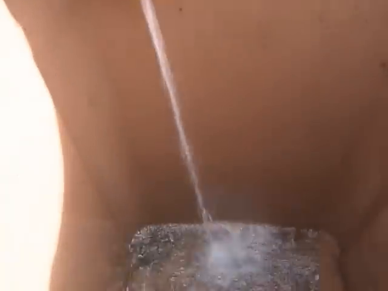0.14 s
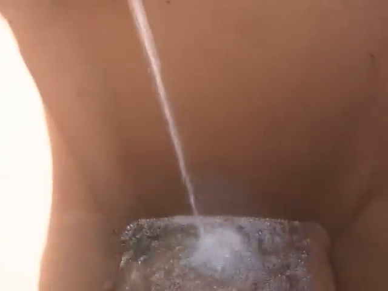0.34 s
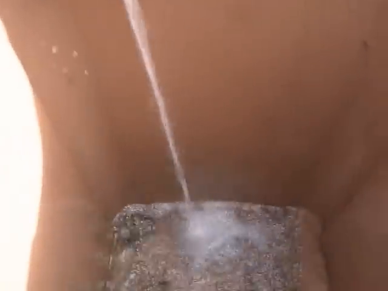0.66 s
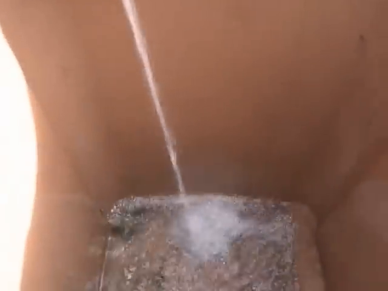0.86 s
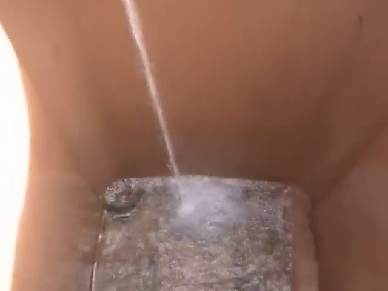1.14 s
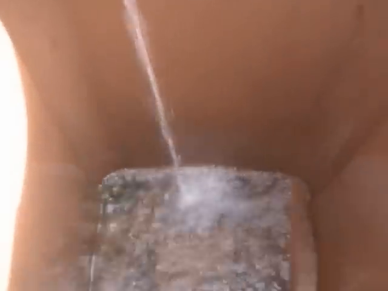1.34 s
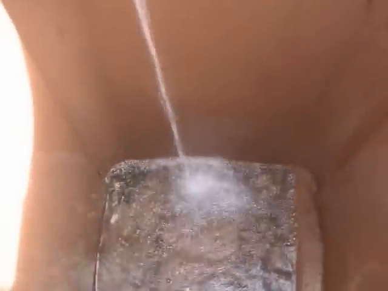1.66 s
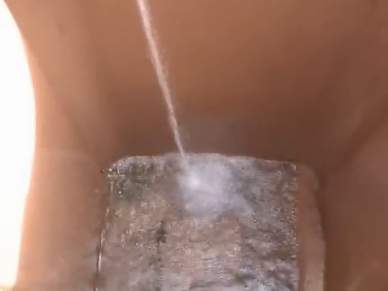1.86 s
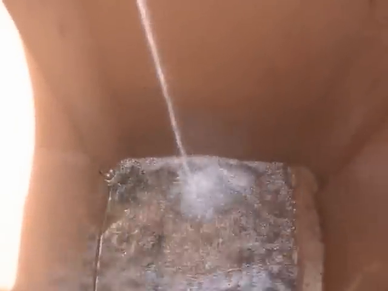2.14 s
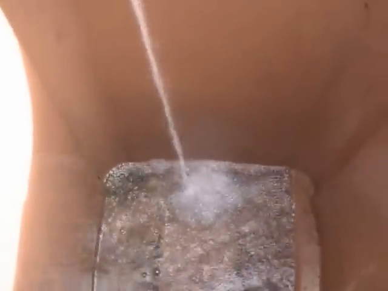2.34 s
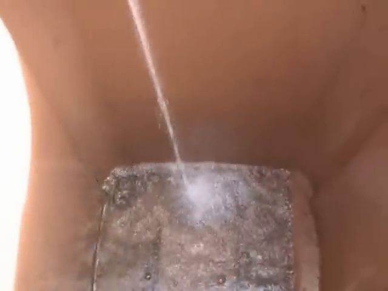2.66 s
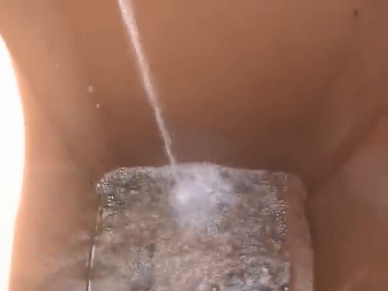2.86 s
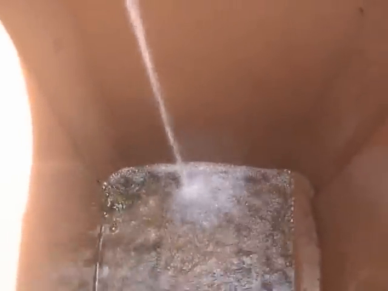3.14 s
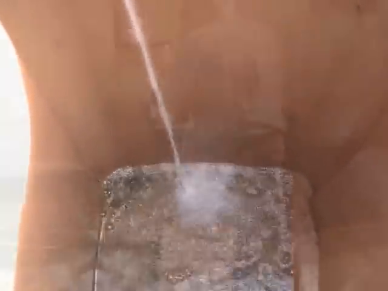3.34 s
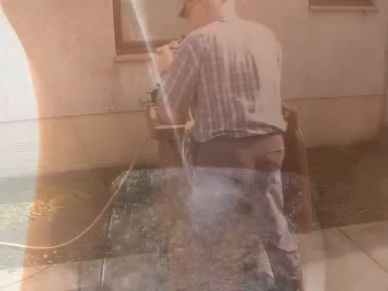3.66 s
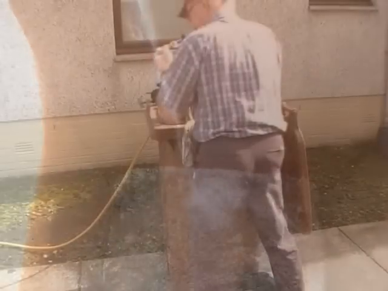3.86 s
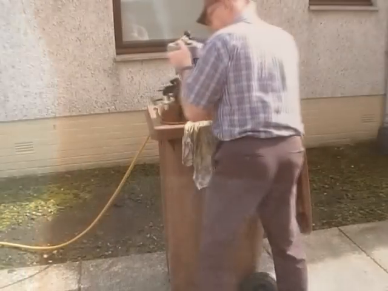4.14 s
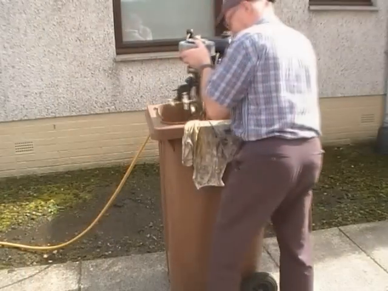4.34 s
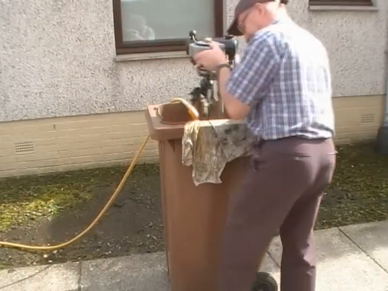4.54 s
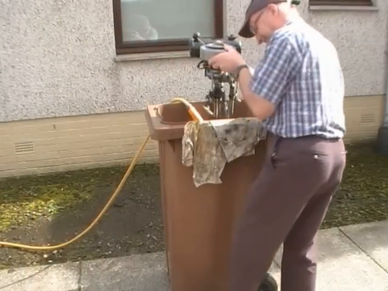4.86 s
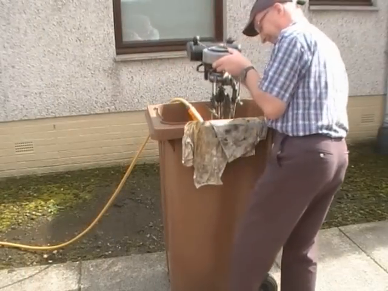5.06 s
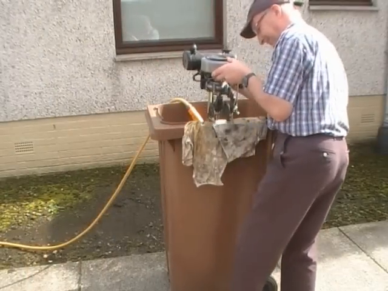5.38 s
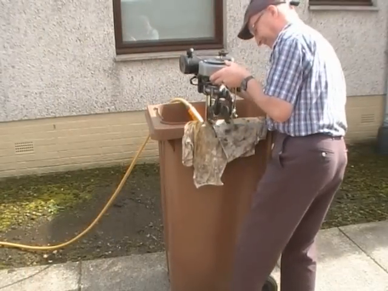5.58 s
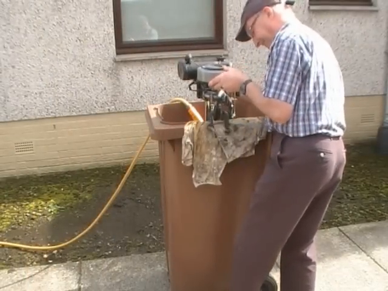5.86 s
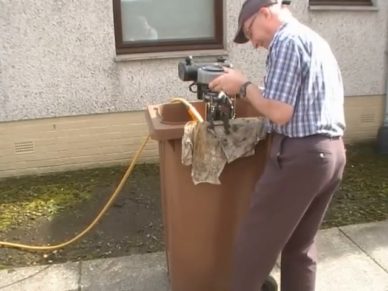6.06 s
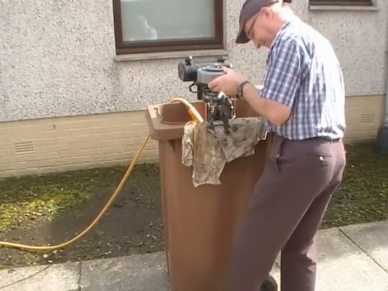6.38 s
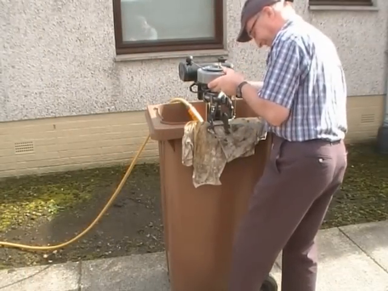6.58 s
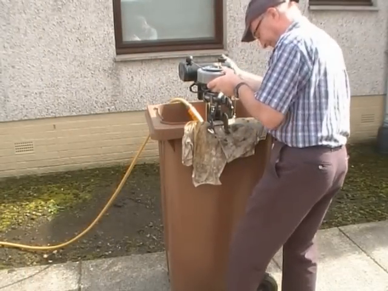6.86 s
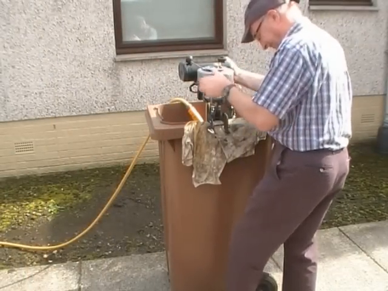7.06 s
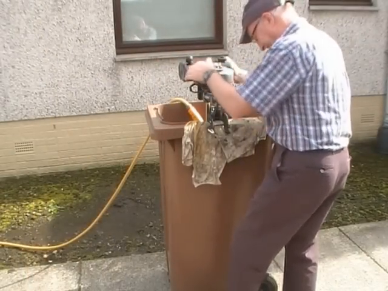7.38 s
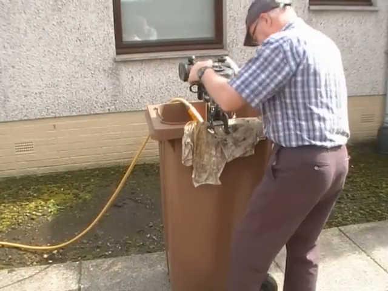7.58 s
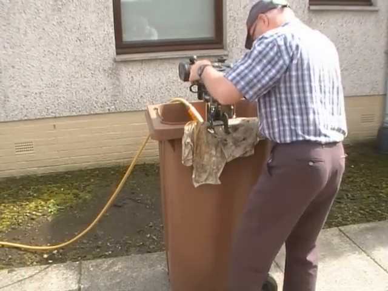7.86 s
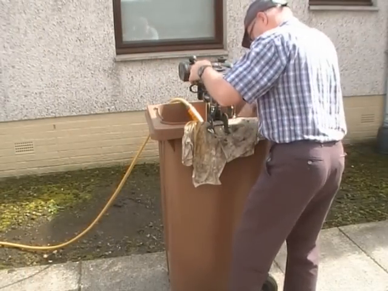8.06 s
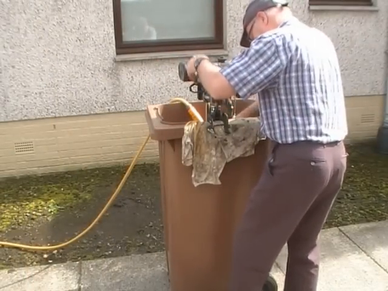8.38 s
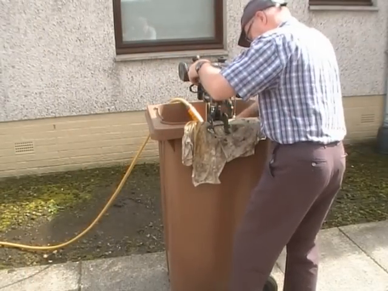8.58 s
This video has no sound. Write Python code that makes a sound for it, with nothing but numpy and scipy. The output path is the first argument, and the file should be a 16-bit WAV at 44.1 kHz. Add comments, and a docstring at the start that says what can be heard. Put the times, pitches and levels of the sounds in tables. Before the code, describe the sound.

Water sprays and drums inside a plastic bin, cuts off, and a few sharp knocks follow in a quiet yard.

```python
"""A hose jet hammers the shallow water in a plastic bin, heard from the rim, until the scene changes. Its slugs
and drops spray and drum on the pool, and entrained air rings as bubbles, coloured by the bin's resonances.
Then, from a few steps away: the wash of distant traffic, far birds, rustling cloth and small ticks, and a heavy
metal object that clinks, knocks on the bin's rim and bounces twice, each impact exciting the damped modes of
the bin and of the metal."""
import sys
import numpy as np
from scipy import signal
from scipy.io import wavfile
from scipy.ndimage import uniform_filter1d

SR = 44100
rng = np.random.default_rng(int(sys.argv[2]) if len(sys.argv) > 2 else 0)


def digitize_waveform(pressure):
    """Quantize a signal to 16-bit integers and store it at the path in sys.argv[1].

    Rows of a 2-D input are taken as channels; values are limited to [-1, 1].
    """
    field = np.atleast_2d(pressure).T
    bounded = np.clip(field, -1, 1)
    quanta = np.round(bounded * 32767).astype(np.int16)
    wavfile.write(sys.argv[1], SR, quanta)


N = 384552
T = np.arange(N) / SR
SCENE_SWITCH_S = 4.551

# spectrum of rustles and ticks: (frequency [Hz], relative level [dB])
RUSTLE_SPECTRUM = [(1470, -9), (2500, -3), (3720, -9.5), (4370, -5.5), (7890, -7), (11800, -13.5),
                   (16000, -24)]
# likeness of the background at the two ears: (frequency [Hz], coherence [0-1])
YARD_COHERENCE = [(60, 0.4), (180, 0.28), (550, 0.88), (1650, 0.78), (4970, 0.3), (15000, 0.35)]


def amp(db):
    """Amplitude ratio of a level in decibels."""
    return 10 ** (np.asarray(db) / 20)


def unit_rms(x):
    """Normalisation to unit mean power."""
    return x / np.sqrt(np.mean(x ** 2) + 1e-20)


def curve_at(points, hz):
    """Interpolation on a logarithmic frequency axis."""
    f, value = np.transpose(points)
    return np.interp(np.log(hz + 1), np.log(f + 1), value)


def add(mix, s, sound):
    """Superposition: a sound joins the mix at s seconds."""
    part = mix[:, round(s * SR):][:, :sound.shape[-1]]
    part += sound[..., :part.shape[-1]]


def panned(x, db):
    """Interaural level difference: the left is louder by db."""
    return x * amp([[db / 2], [-db / 2]])


def noise(colour_db, coherence, patch_db, size):
    """Fourier synthesis of partly coherent stereo noise, with drifting louder and softer patches."""
    hz = np.fft.rfftfreq(size, 1 / SR)
    a, b, c, d, patches = rng.standard_normal((4 * N // size + 5, len(hz), 5)).T
    patches = unit_rms(uniform_filter1d(uniform_filter1d(patches, 10, 0), 8, 1))
    likeness = np.clip(curve_at(coherence, hz), -1, 1)[:, None]
    left = a + 1j * b
    right = likeness * left + np.sqrt(1 - likeness ** 2) * (c + 1j * d)
    spectra = np.array([left, right]) * amp(colour_db(hz)[..., None] + patch_db * patches)
    return unit_rms(signal.istft(spectra, nperseg=size, noverlap=3 * size // 4)[1][:, :N])


def minimum_phase(colour_db, size=2048):
    """Causal impulse response: its phase follows from the log gain by the Hilbert transform."""
    log_gain = np.log(amp(np.maximum(colour_db(abs(np.fft.fftfreq(4 * size, 1 / SR))), -100)))
    taps = np.fft.ifft(np.exp(np.conj(signal.hilbert(log_gain)))).real[:size]
    return taps / np.linalg.norm(taps)


def impulses(per_s, spread_db):
    """A Poisson process of clicks, most small, a few large."""
    return (rng.random(N) < per_s / SR) * amp(spread_db * np.minimum(rng.exponential(1, N), 4))


def relaxed(power, decay_s):
    """Exponential relaxation: each input dies away; the result has mean 1."""
    response = signal.lfilter([1], [1, -np.exp(-1 / (decay_s * SR))], power)
    return response / response.mean()


def scattered(x, db, t60, size=800):
    """Diffuse reflection: each ear gets the direct sound and its own decaying echoes."""
    taps = amp(db) * rng.standard_normal((2, size)) * amp(-60 * np.arange(size) / SR / t60)
    taps[:, 0] = 1
    taps /= np.linalg.norm(taps, axis=1, keepdims=True)
    return signal.oaconvolve(x[None], taps, axes=1)[:, :len(x)]


def traffic():
    """Distant vehicles sum incoherently to a dull wash that swells and fades."""
    # colour of the wash: (frequency [Hz], relative level [dB])
    spectrum = [(15, -67), (25, -61), (64, -17), (153, -22), (277, -15), (416, -11), (659, -3.5),
                (936, -0.5), (1070, -4), (1790, -12.5), (2280, -19.5), (10400, -54), (16000, -47.5)]
    # its slow swell: (time [s], level [dB])
    levels = [(4.55, -43), (4.9, -44), (5.3, -42.5), (6.1, -41.5), (6.7, -42.5), (7.2, -44.5), (7.9, -42),
              (8.72, -43)]
    wash = noise(lambda hz: curve_at(spectrum, hz), YARD_COHERENCE, patch_db=1.4, size=2048)
    return amp(np.interp(T, *np.transpose(levels))) * wash


def rustle():
    """Friction of hands and cloth makes a grainy treble noise that grows with each movement."""
    # movements: (peak time [s], level [dB], swell [s], fade [s])
    shuffles = [(4.56, -43, .01, 0.034), (4.7, -66.5, .1, 0.44), (6.1, -65, 0.12, .2),
                (6.88, -51, 0.047, 0.064), (6.98, -52.5, 0.058, .04), (7.3, -70, 0.11, .2)]
    grain = relaxed(impulses(per_s=150, spread_db=3.5) ** 2, decay_s=.003)
    hiss = noise(lambda hz: curve_at(RUSTLE_SPECTRUM, hz), YARD_COHERENCE, patch_db=0.98, size=256)
    motion = sum(amp(db) * np.exp(-abs(T - s) / np.where(T < s, swell_s, fade_s))
                 for s, db, swell_s, fade_s in shuffles)
    at_rest = amp(-65.5)
    return (at_rest + motion) * hiss * np.sqrt(0.56 + 0.2 * grain)


def birds():
    """Far birds whistle gliding tones; random frequency and amplitude modulation makes two hoarse."""
    # notes: (time [s], length [s], first pitch [Hz], last pitch [Hz], level [dB], roughness [Hz])
    notes = [(5.715, .04, 3400, 4440, -59, 30), (6.406, 0.022, 5100, 5670, -64, 30),
             (6.548, .035, 4550, 5030, -59, 30), (6.56, 0.035, 3800, 4600, -56, 30),
             (7.81, 0.11, 4900, 4730, -62, 110), (7.869, .085, 3580, 3730, -53, 149)]
    out = np.zeros((2, N))
    for s, length, first_hz, last_hz, db, rough_hz in notes:
        progress = np.linspace(0, 1, round(length * SR))
        wobble, flutter = (unit_rms(uniform_filter1d(v, 150))
                           for v in rng.standard_normal((2, len(progress))))
        hz = first_hz + (last_hz - first_hz) * progress ** 1.5 + rough_hz * wobble
        swell = np.sin(np.pi * progress ** 0.57) * amp(db + 0.053 * rough_hz * flutter)
        note = np.pad(swell * np.sin(2 * np.pi * np.cumsum(hz) / SR), (0, SR // 5))
        add(out, s, scattered(note, db=-33, t60=0.4, size=SR // 5))
    return out


def ticks():
    """Loose parts touch: each brief contact gives a broadband snap and one heavily damped mode."""
    # contacts: (time [s], relative level [dB], pitch [Hz])
    contacts = [(4.6394, -43, 8820), (4.7511, -38, 5730), (4.768, -34, 5800), (4.9985, -43, 7450),
                (5.1637, -45, 8310), (5.9208, -43, 7600), (6.2744, -43, 5540), (6.382, -44, 11500),
                (6.8039, -34, 7560), (6.853, -33, 5650), (6.8912, -35, 4500), (6.9144, -31, 6600),
                (6.9344, -37, 6770), (6.9571, -37, 4930), (7.0044, -37, 7970), (7.0294, -40, 7200),
                (7.0539, -44, 5640), (7.0938, -42.5, 7100), (7.1302, -46, 6000), (7.1671, -42.5, 4880),
                (7.2684, -46, 5140), (7.3576, -44, 4550), (7.3866, -43.5, 4670), (7.659, -38, 7300)]
    out, t = np.zeros((2, N)), np.arange(500) / SR
    colour = minimum_phase(lambda hz: curve_at(RUSTLE_SPECTRUM, hz))
    for s, db, hz in contacts:
        burst = rng.standard_normal(len(t)) * amp(-60 * t / 0.013)
        snap = signal.oaconvolve(burst, colour)[:len(t)]
        ping = np.sin(2 * np.pi * hz * t) * amp(-60 * t / 0.0062)
        add(out, s, panned(amp(db) * (0.41 * snap + .5 * ping), db=-.7))
    return out


def ring(modes, t, rise_cycles):
    """Free vibration as a sum of damped modes, the low ones slower to start; no two blows are alike."""
    chance = rng.standard_normal((len(modes), 2))
    return sum(amp(db + 2. * louder - 60 * t / t60)
               * np.sin(2 * np.pi * hz * (1 + 0.0051 * sharper) * t)
               * (1 - np.exp(-hz * t / rise_cycles))
               for (hz, db, t60), (louder, sharper) in zip(modes, chance))


def blows():
    """Impact excitation: a crack with a rattling tail, the hollow bin's thud and the metal's ring."""
    # blows: (time [s], crack gain [dB], thud gain [dB], metal gain [dB],
    # crack tilt [dB/octave], thud tilt [dB/octave], left over right [dB])
    impacts = [(5.556, -80, -54, -80, -3, -14.5, -10), (5.585, -46, -46, -75, -6, 2, 0),
               (5.598, -31.5, -34.5, -45, 6, 3, 1), (5.606, -36, -42.5, -48, -1, 6, -3),
               (6.027, -10.5, -19, -55, 3.1, -1.5, -0.5), (6.129, -17.5, -23, -62, 1.2, -2, -0.5),
               (6.196, -26.5, -32, -70, -8, 0.5, -1), (6.867, -36, -58, -80, -4, 10.5, -1),
               (6.985, -37, -48, -80, 1, 7, -2.8)]
    # contact noise: (frequency [Hz], relative level [dB])
    crack_spectrum = [(590, -40), (1000, -5.5), (2200, 3), (4960, -7), (6040, -14), (8360, -7), (9060, -13),
                      (16000, -33)]
    # modes of the bin's wall: (frequency [Hz], relative level [dB], T60 [s])
    wall_modes = [(95, -19.5, 0.175), (123.4, -26, 0.68), (145, -30, 0.45), (185, -21.5, 0.33),
                  (236, -9.5, 0.14), (313, -6.5, 0.11), (381, -13.5, 0.17), (470, 10, 0.029),
                  (639, -1.5, 0.08), (821, -4.5, 0.16), (952, -9, 0.076), (1700, 0.5, 0.03),
                  (2020, -2, 0.023), (2470, -20, 0.042)]
    # modes of the metal object: (frequency [Hz], relative level [dB], T60 [s])
    metal_modes = [(5168, -19, .16), (6600, -3, .1), (7445, -10, .12), (8600, -4, 0.09), (10570, -11, .2),
                   (10600, -3, 0.17), (10860, -8, 0.12), (14600, -17, .1)]
    out, t = np.zeros((2, N)), np.arange(round(.5 * SR)) / SR
    fall = amp(-60 * t / 0.029) + amp(-9 - 60 * t / 0.2)
    for s, crack_db, thud_db, metal_db, crack_tilt, thud_tilt, pan_db in impacts:
        colour = minimum_phase(
            lambda hz: curve_at(crack_spectrum, hz) + crack_tilt * np.log2(hz / 3000 + .1))
        shared, *per_ear = rng.standard_normal((3, len(t)))
        burst = (0.46 * shared + 0.2 * np.array(per_ear)) * fall
        crack = signal.oaconvolve(burst, colour[None], axes=1)[:, :len(t)]
        # the thin walls flap on after the blow: smaller pushes thicken the thud
        pushes = 0.16 * rng.standard_normal(len(t)) * amp(-60 * t / 0.32) * (rng.random(len(t)) < .02)
        pushes[0] = 1
        wall = [(hz, db + thud_tilt * np.log2(hz / 400), t60) for hz, db, t60 in wall_modes]
        thud = signal.oaconvolve(pushes, ring(wall, t, rise_cycles=1.44))[:len(t)]
        thud = scattered(thud, db=-36, t60=0.021)
        metal = ring(metal_modes, t, rise_cycles=8.)
        add(out, s, panned(amp(crack_db) * crack + amp(thud_db) * thud + amp(metal_db) * metal, pan_db))
    return out


def plops():
    """Bubble resonance: a large bubble rings briefly, rising in pitch as it nears the surface."""
    # large bubbles: (time [s], relative level [dB], starting pitch [Hz])
    bubbles = [(0.124, -17, 1270), (0.732, -12.5, 1260), (0.94, -10.5, 1876), (1.061, -20, 1285),
               (1.131, -11, 1300), (1.403, -24, 1190), (1.934, -16, 1303), (2.044, -22, 988),
               (2.086, -18, 1204), (2.184, -15, 1235), (2.351, -23, 1280), (3.208, -13.5, 1280),
               (3.443, -17.5, 1190), (3.692, -18, 1843), (3.866, -14, 925), (3.907, -15, 2030),
               (3.981, -17, 1210), (4.141, -14.5, 1240), (4.193, -19, 970), (4.322, -9.5, 2050),
               (4.489, -13.5, 1336)]
    out, t = np.zeros((1, N)), np.arange(round(.1 * SR)) / SR
    t60 = 0.053
    for s, db, hz in bubbles:
        swell = amp(db - 60 * t / t60) * (1 - np.exp(-t / 0.0099))
        add(out, s, swell * np.sin(2 * np.pi * hz * t * (1 + 1.5 * t)))
    return panned(scattered(out[0], db=-28, t60=.02), db=-0.95)


def bin_gain_db(hz):
    """Resonance of the bin's air and walls, as Lorentzian peaks and dips."""
    # peaks and dips: (frequency [Hz], width [Hz], gain [dB])
    resonances = [(124.9, 14, 10), (265, 69, 2), (462.5, 24, 10), (643, 170, 5), (811, 25, -9.5),
                  (975, 43, 4), (1295, 81, 5.5), (1730, 35, -0.5), (1860, 82, 4), (2136, 137, 6),
                  (2470, 150, 4)]
    return sum(db / (1 + (2 * (hz - f) / width) ** 2) for f, width, db in resonances)


def gurgle(push, low_hz=700, high_hz=2900):
    """Air entrainment: bubbles ring in short rising notes, more of them as the jet pushes harder."""
    bubbles = np.zeros(N)
    for hz in np.geomspace(low_hz, high_hz, 24):
        cycles = np.arange(round(30 * SR / hz)) * hz / SR
        envelope = np.exp(-cycles / 12.0) * (1 - np.exp(-cycles / 0.95))
        note = envelope * np.sin(2 * np.pi * cycles * (1 + 0.00331 * cycles))
        births = impulses(per_s=30 * push, spread_db=0.78)
        bubbles += signal.oaconvolve(births, note * amp(2.0 * np.log2(hz / low_hz)))[:N]
    in_bin = unit_rms(signal.oaconvolve(bubbles, minimum_phase(bin_gain_db))[:N])
    return panned(scattered(in_bin, db=-28.0, t60=0.018), db=-0.9)


def jet_noise(colour_db, patch_db, size):
    """Interaural coherence and level place the water's noise close by, slightly to the right."""
    # likeness at the two ears: (frequency [Hz], coherence [0-1])
    coherence = [(60, 0.43), (110, 0.8), (200, 0.92), (380, 0.94), (700, 0.94), (1290, 0.97), (2380, 0.53),
                 (4400, 0.65), (8120, 0.65), (15000, 0.22)]
    # balance between the ears: (frequency [Hz], left over right [dB])
    balance = [(60, 1), (240, -2.5), (950, -1.5), (3770, -0.5), (15000, -0.5)]
    return noise(lambda hz: colour_db(hz) + np.outer([.5, -.5], curve_at(balance, hz)),
                 coherence, patch_db, size)


def pool():
    """Forced vibration of the pool, coloured by the bin and split into drumming and low rumble."""
    # thrum of the water: (frequency [Hz], relative level [dB])
    spectrum = [(15, -55.5), (25, -12.5), (168, -16), (273, -4.5), (351, -12.5), (594, -0.5), (826, -8.5),
                (1270, -2), (2600, -8.5), (3380, -12), (5720, -120)]
    thrum = jet_noise(lambda hz: curve_at(spectrum, hz) + bin_gain_db(hz), patch_db=1.7, size=2048)
    rumble = signal.sosfiltfilt(signal.butter(2, 380, fs=SR, output="sos"), thrum)
    return unit_rms(thrum - rumble), unit_rms(rumble)


def spray(steady, power):
    """Shot noise: countless impacts merge into a hiss, and single drops crack on top."""
    # colour of the spray: (frequency [Hz], relative level [dB])
    spectrum = [(1470, -37.5), (2500, -11), (3570, -11), (4990, -6), (6450, -6), (9010, 0.5), (11100, -9.5),
                (15200, -17), (16000, -37)]
    mist = jet_noise(lambda hz: curve_at(spectrum, hz), patch_db=1.55, size=512)
    drops = relaxed(impulses(per_s=350, spread_db=3.5) ** 2, decay_s=.0004)
    return mist * np.sqrt(power + 0.45 * np.sqrt(steady * power) * drops)


def breakup(spray_gain):
    """Jet instability breaks the stream into slugs; returns its power without and with their slaps."""
    # slugs that slap down hardest: (time [s], level [dB], duration [s])
    slaps = [(0.02, -23, 0.0043), (0.219, -25, 0.0072), (0.3143, -25, 0.026), (0.376, -23, 0.0065),
             (0.569, -24, 0.015), (0.628, -20, 0.0029), (0.77, -22, 0.018), (0.984, -22, .01),
             (1.067, -23.5, 0.025), (1.156, -20.5, 0.0078), (1.22, -20.5, 0.0062), (1.365, -24, 0.005),
             (1.4205, -25.5, 0.029), (1.529, -23.5, 0.0064), (1.6093, -21, 0.023), (1.698, -23.5, 0.0053),
             (1.783, -22.5, 0.018), (1.8612, -23.5, .005), (1.903, -26.5, 0.0045), (2.113, -19.5, 0.0089),
             (2.18, -22.5, 0.02), (2.2305, -23.5, 0.0054), (2.351, -20.5, 0.012), (2.422, -24, 0.013),
             (2.508, -22, 0.0073), (2.562, -21, 0.0093), (2.64, -22.5, 0.011), (2.71, -21.5, .008),
             (2.78, -21.5, 0.0079), (2.826, -19.5, 0.0042), (2.9115, -21.5, 0.0058), (2.953, -22.5, 0.0029),
             (2.973, -22, 0.0034), (3.027, -24, .01), (3.225, -19.5, 0.009), (3.3065, -20, 0.0062),
             (3.4227, -24.5, 0.0044), (3.509, -21.5, 0.0043), (3.656, -23, 0.0083), (3.753, -21, 0.0062),
             (4.0367, -20, 0.005), (4.093, -24, 0.0086), (4.1723, -23.5, .012), (4.343, -23.5, 0.0049),
             (4.4074, -24.5, 0.019), (4.486, -18, 0.0034)]
    rise_s, t60 = .001, 0.031
    thin_after_s, thin_width_s = 0.011, 0.014  # the stream runs thin just behind each hard slug
    thinning, t = np.zeros(N), np.arange(round(.2 * SR)) / SR
    for s, _, lasts in slaps:
        add(thinning[None], s + lasts, 0.3 * np.exp(-((t - thin_after_s) / thin_width_s) ** 2))
    steady = spray_gain ** 2 * np.clip(1 - thinning, .05, 1)
    slugs = relaxed(impulses(per_s=90, spread_db=2.0) ** 2, decay_s=.007)
    power = steady * (0.85 + 0.27 * slugs)
    for s, db, lasts in slaps:
        slap = amp(db - 60 * np.maximum(t - lasts, 0) / t60) * np.minimum(t / rise_s, 1)
        add(power[None], s, slap ** 2)
    return steady, power


def jet():
    """Momentum transfer: the stream drives spray, drumming and gurgle until the scene changes."""
    # surges and sags: (time [s], spray gain [dB], drumming gain [dB], gurgle gain [dB])
    surges = [(0.0, -24.5, -30, -34), (0.08, -28.5, -36.5, -31), (0.21, -22, -25.5, -35.5),
              (0.4, -25.5, -29, -36), (0.56, -23, -28, -32), (0.65, -28.5, -36, -36.5),
              (0.74, -27.5, -32.5, -33.5), (0.86, -29, -34, -38), (0.94, -23.5, -33, -27),
              (1.03, -26, -29.5, -35.5), (1.2, -24.5, -29, -32), (1.3, -27.5, -31, -37),
              (1.439, -24.5, -34.5, -30), (1.6, -27, -31.5, -35.5), (1.855, -24, -30.5, -36),
              (1.884, -29.5, -36.5, -39.5), (2.06, -29, -32.5, -35), (2.18, -27, -28, -31.5),
              (2.229, -30.5, -34, -33), (2.289, -23, -27.5, -29.5), (2.44, -29.5, -32.5, -43),
              (2.5, -26.5, -29.5, -36.5), (2.7, -30, -31.5, -34.5), (2.86, -23.5, -27.5, -31.5),
              (2.97, -30.5, -31, -38), (3.1, -27, -30.5, -34.5), (3.27, -25, -27.5, -31.5),
              (3.42, -26.5, -28, -36), (3.6, -28, -33, -32), (3.9, -25.5, -29.5, -29.5),
              (4.07, -28, -32, -34), (4.2, -26, -28.5, -29.5), (4.27, -27, -32.5, -34),
              (4.34, -25.5, -30.5, -29), (4.47, -26.5, -27.5, -31), (4.55, -28.5, -35, -30.5)]
    times, *gains_db = np.transpose(surges)
    spray_gain, drum_gain, gurgle_gain = (amp(np.interp(T, times, db)) for db in gains_db)
    steady, power = breakup(spray_gain)
    splash = spray(steady, power)
    # the pool answers each slug a little later and more evenly
    push = relaxed(power / uniform_filter1d(power, round(.12 * SR)), decay_s=0.0049)
    drum, rumble = pool()
    drumming = drum_gain * push ** 0.2 * drum
    gurgling = gurgle_gain * push ** 0.15 * gurgle(push)
    after = np.maximum(T - SCENE_SWITCH_S, 0)
    cutoff = np.maximum(np.clip(1 - after / .002, 0, 1), amp(-19 - 60 * after / 0.25))
    return (splash + drumming + gurgling + amp(-46.5) * rumble) * cutoff


def scene():
    """Superposition of all sources; traffic and rustle enter as the scene changes."""
    water = jet() + plops()
    background = (traffic() + rustle()) * np.clip((T - SCENE_SWITCH_S) / 0.0027, 0, 1)
    return water + background + ticks() + blows() + birds()


def record(dry):
    """Band limiting by a linear-phase low-pass filter."""
    edge_hz = 15900
    low_pass = signal.firwin(511, edge_hz, window=("kaiser", 9), fs=SR)
    return signal.oaconvolve(dry, low_pass[None], "same")


dry = scene()
out = record(dry)
digitize_waveform(out)
```